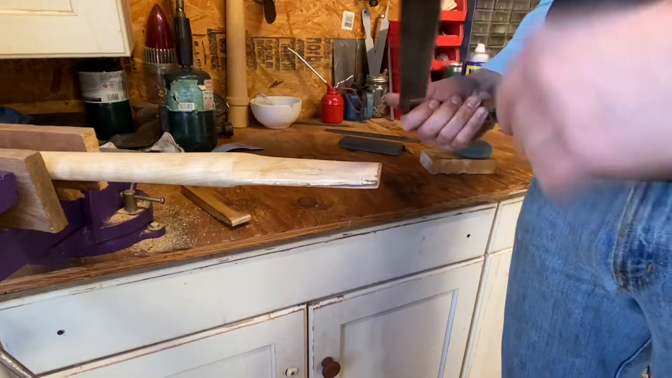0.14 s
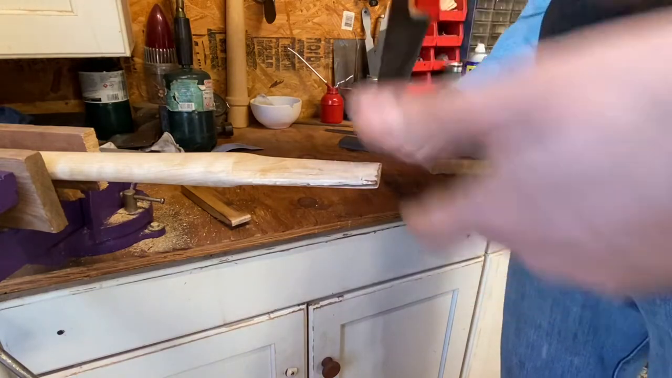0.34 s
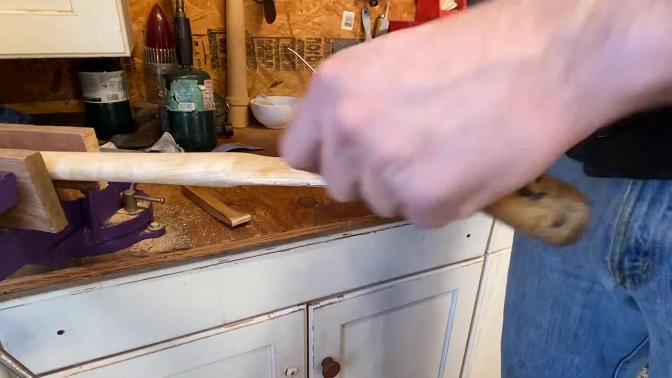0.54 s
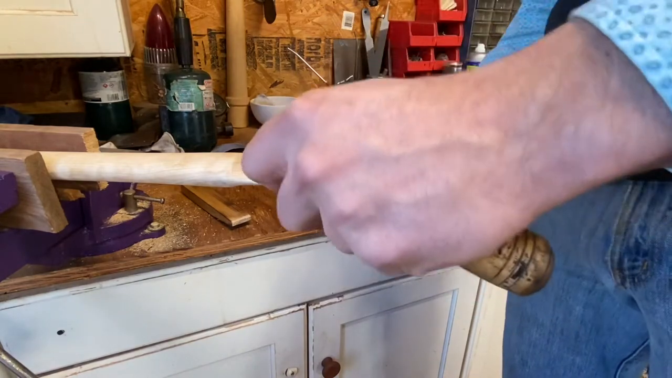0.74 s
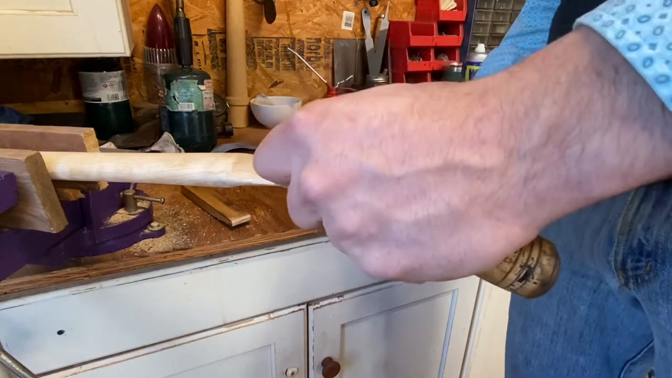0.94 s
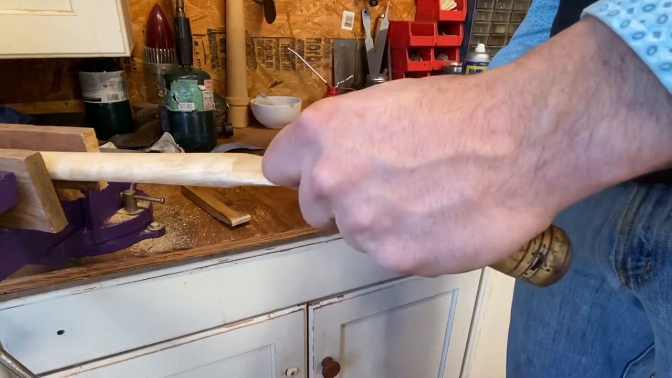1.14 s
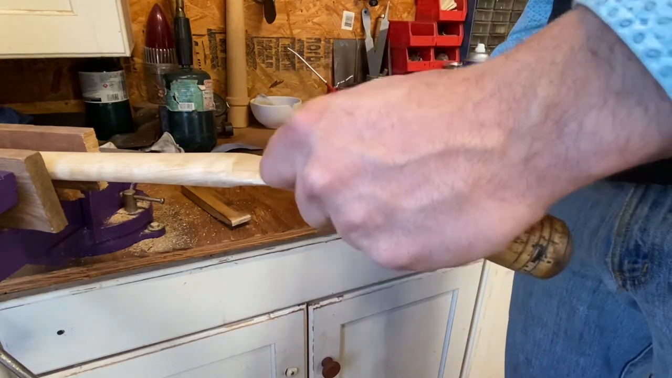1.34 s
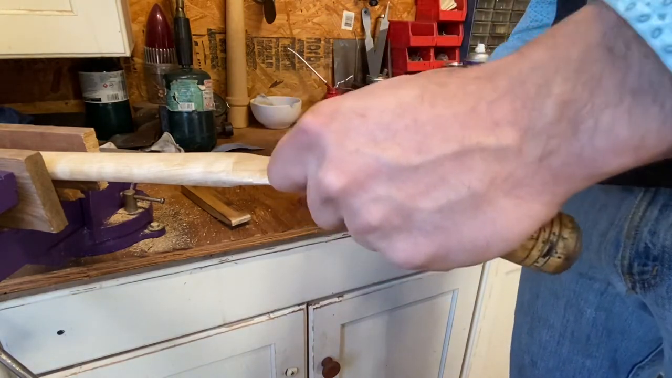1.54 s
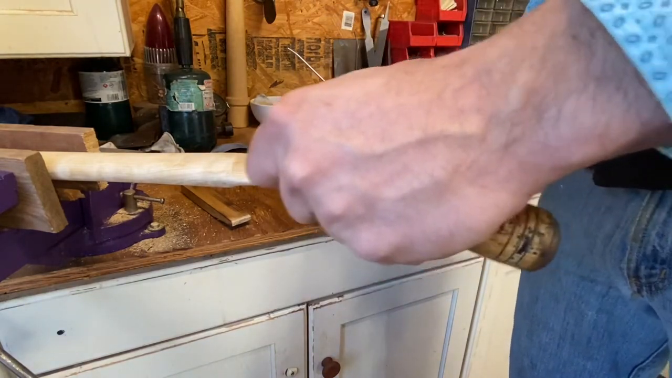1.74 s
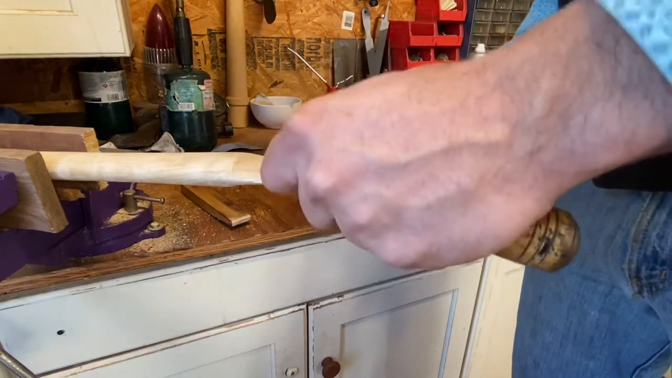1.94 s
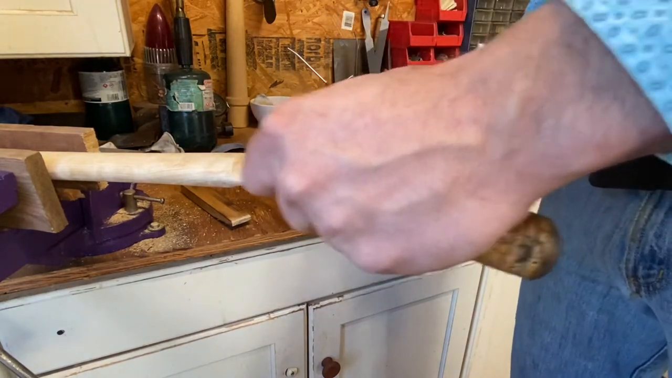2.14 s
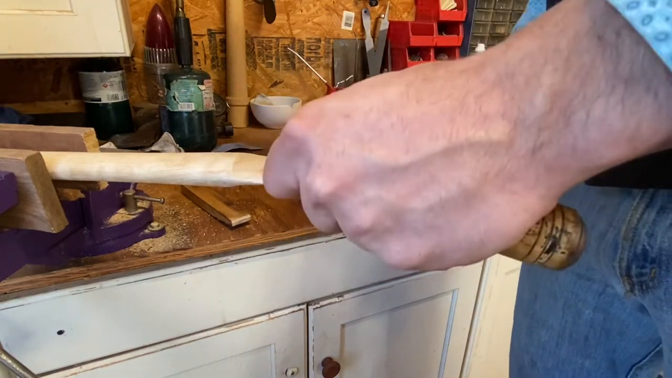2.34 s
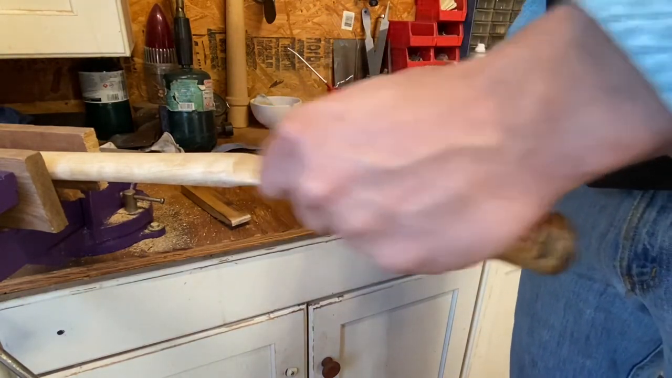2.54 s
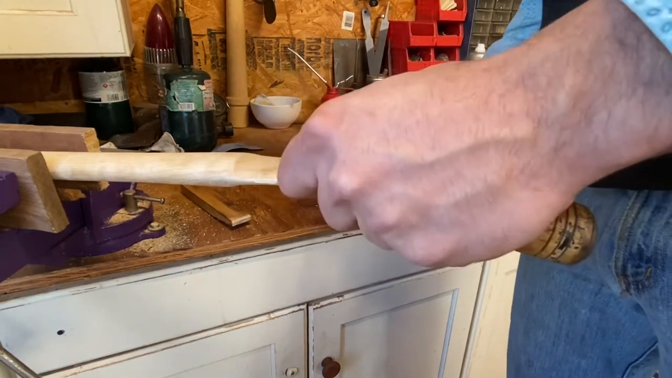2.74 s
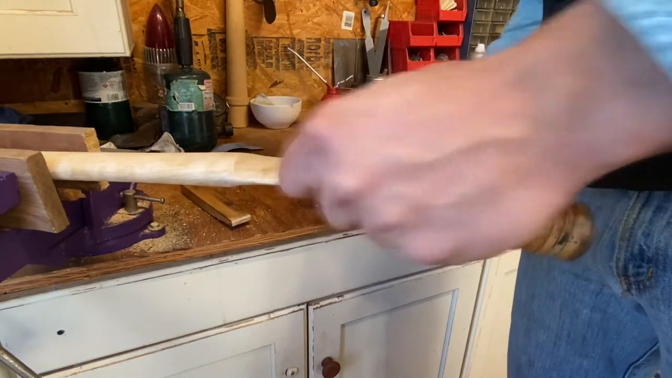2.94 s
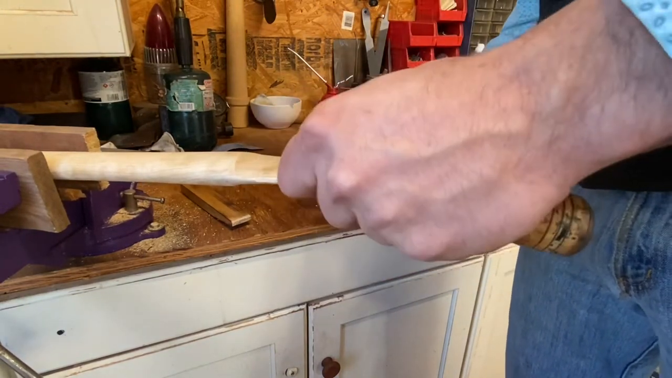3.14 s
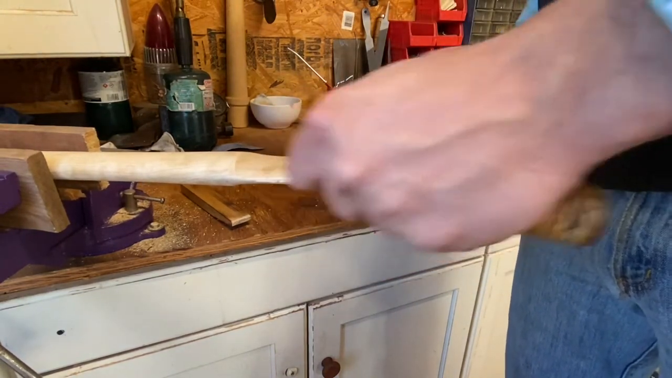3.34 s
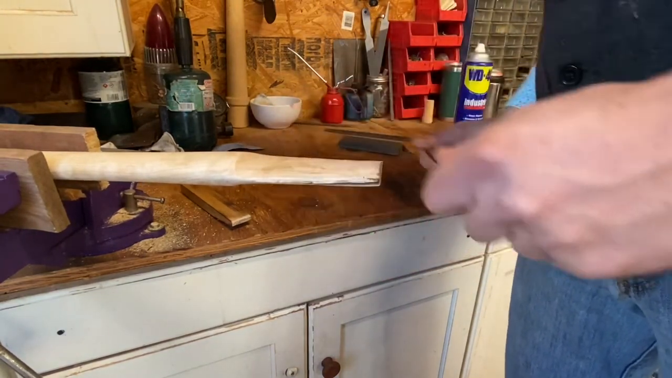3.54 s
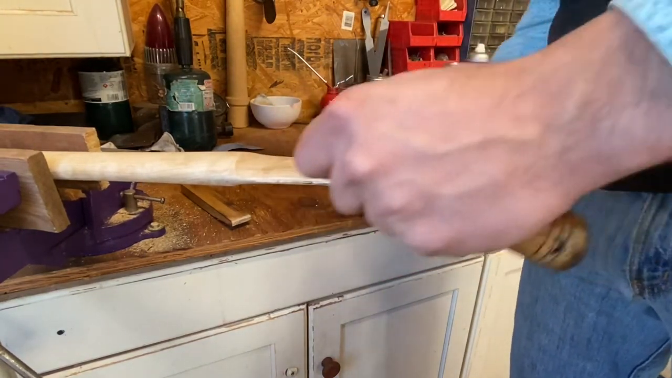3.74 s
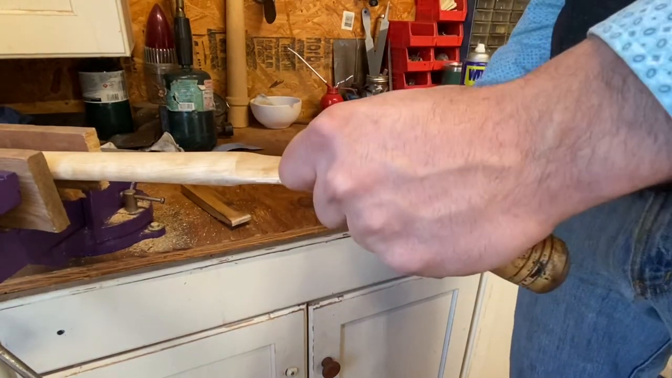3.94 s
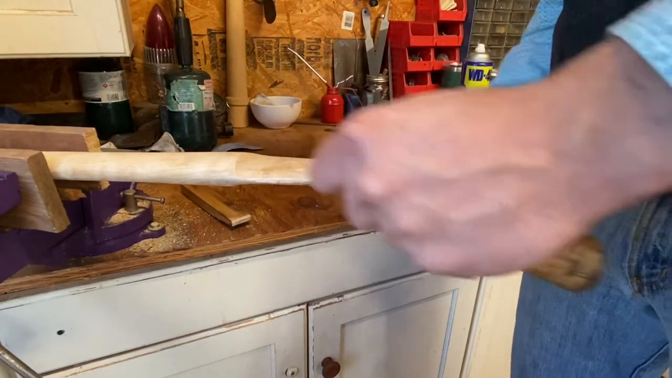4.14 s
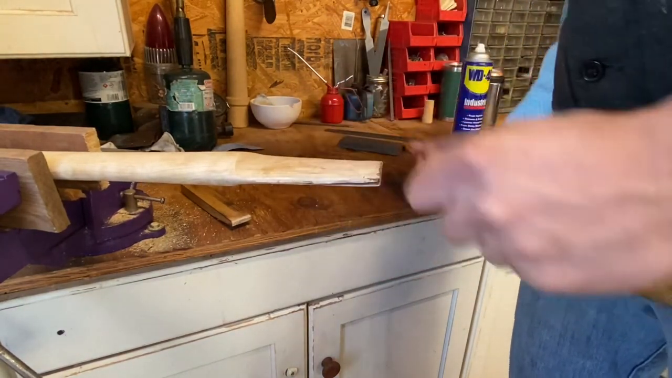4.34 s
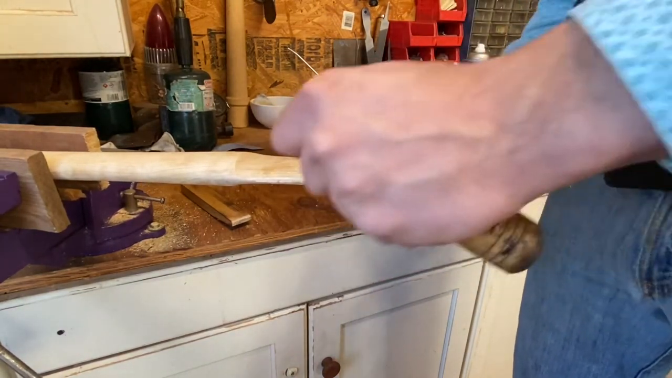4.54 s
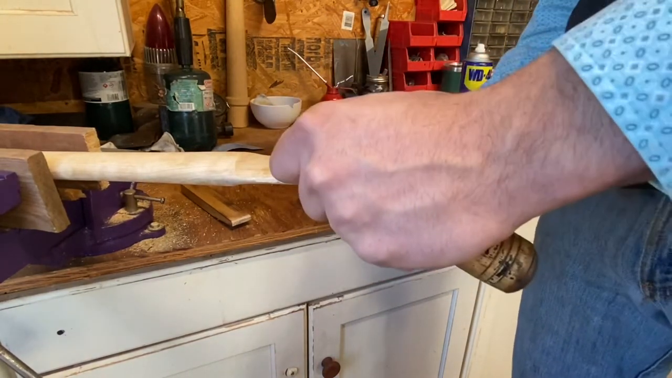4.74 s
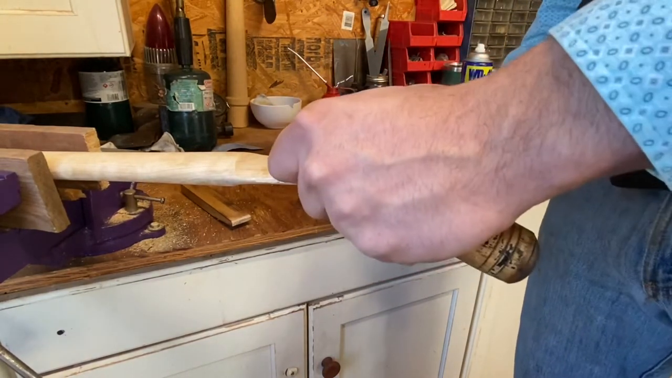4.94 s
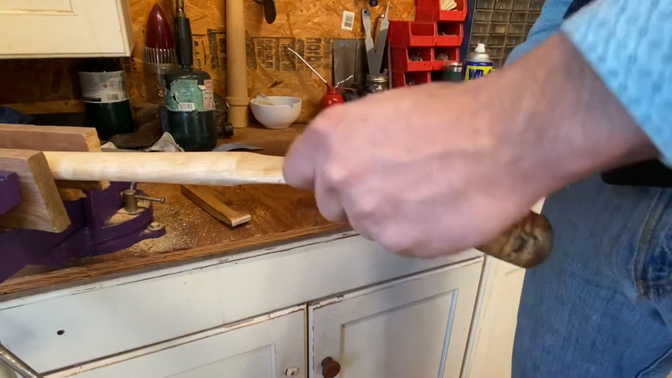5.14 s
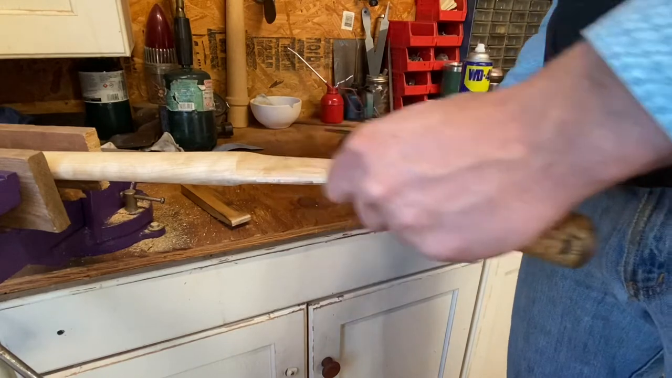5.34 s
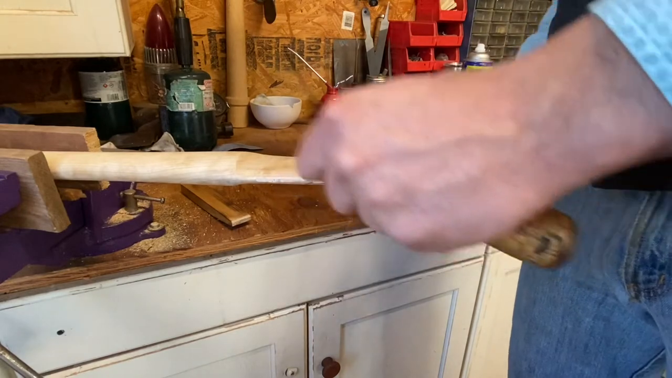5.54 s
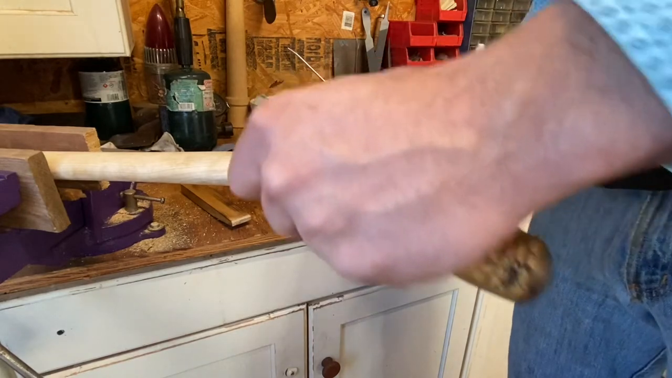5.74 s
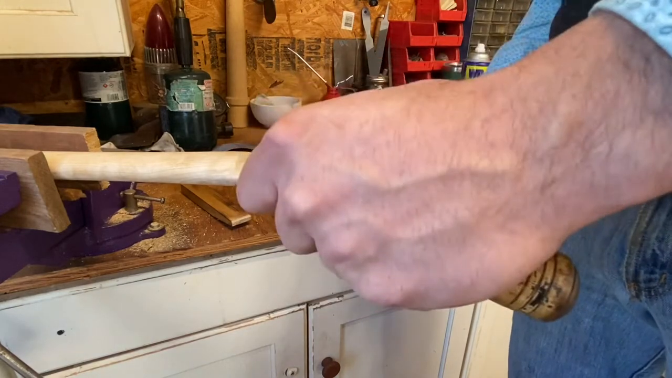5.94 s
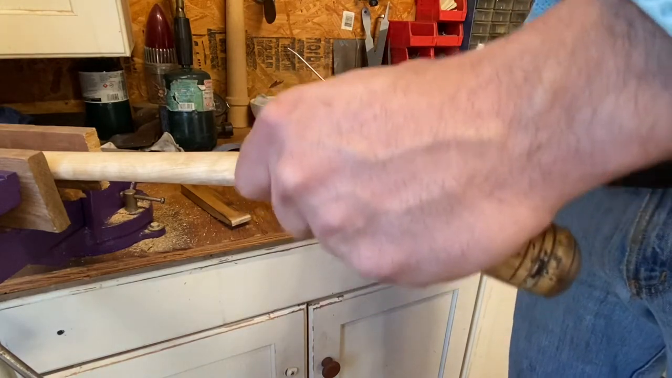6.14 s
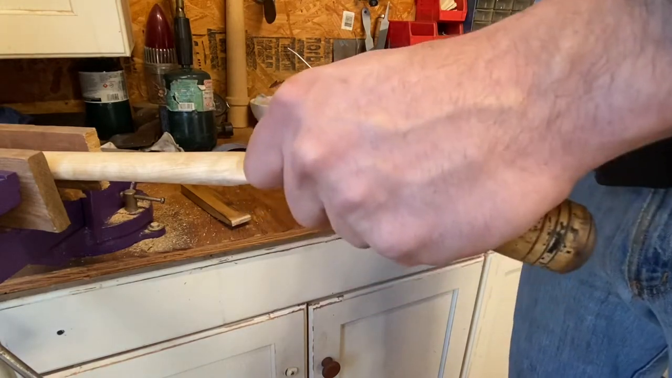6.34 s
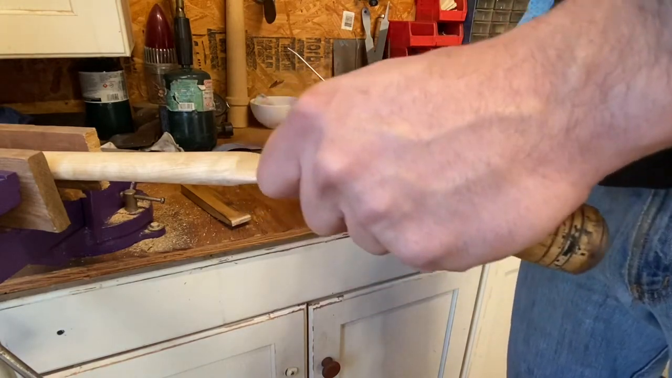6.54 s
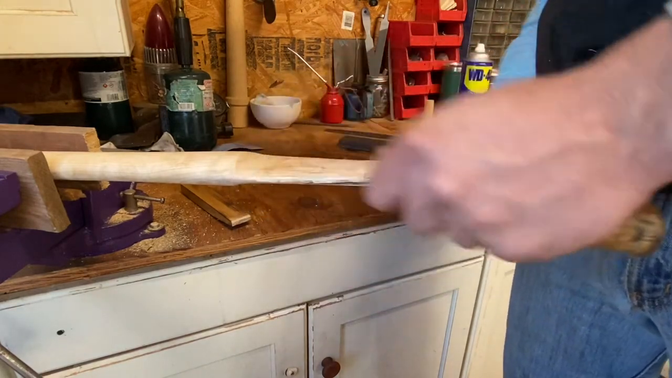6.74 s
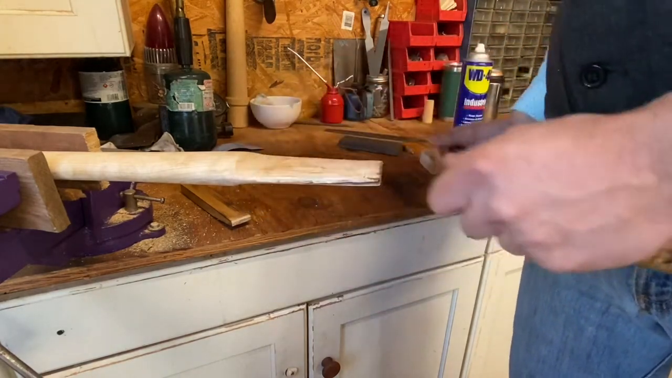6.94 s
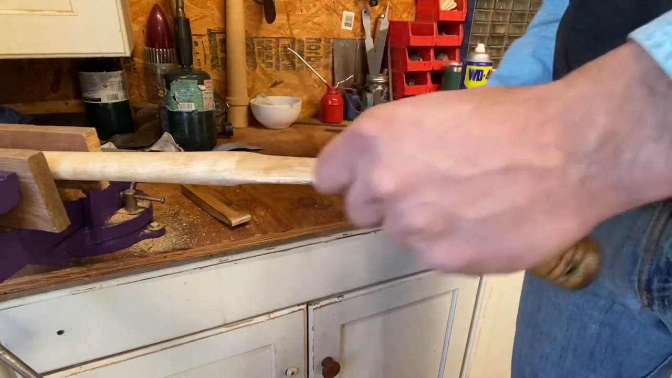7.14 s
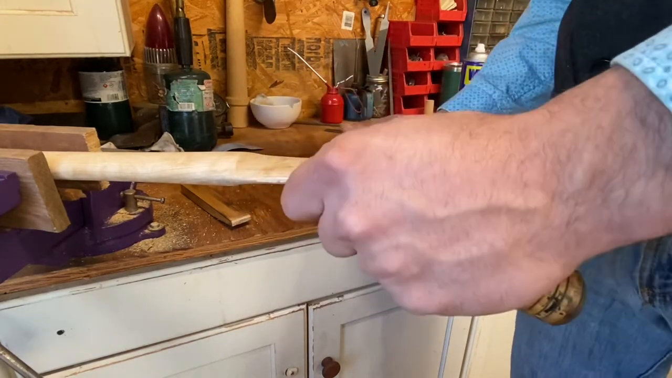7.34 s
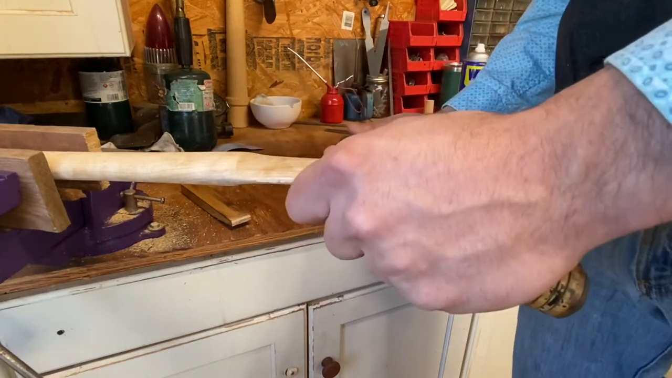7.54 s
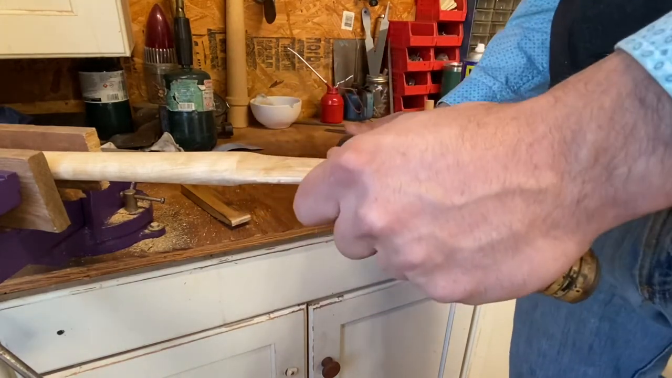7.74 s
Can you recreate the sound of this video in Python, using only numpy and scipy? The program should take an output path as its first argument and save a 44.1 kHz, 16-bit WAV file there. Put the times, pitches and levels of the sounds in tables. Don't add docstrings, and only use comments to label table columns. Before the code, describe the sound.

Close woody knocks and short dry rasps as a drawknife bites into a clamped stick, each landing booming softly through the wooden bench.

```python
import sys
import numpy as np
from scipy import signal
from scipy.fft import rfft, irfft, next_fast_len
from scipy.io import wavfile
from scipy.ndimage import uniform_filter1d

SR = 44100
rng = np.random.default_rng(int(sys.argv[2]) if len(sys.argv) > 2 else 0)


def gain_from_db(level_db):
    decades = np.asarray(level_db, float) / 20
    return 10 ** decades


def file_out(sig):
    cols = np.atleast_2d(sig).T
    lim = np.clip(cols, -1, 1)
    pcm = np.round(lim * 32767).astype(np.int16)
    wavfile.write(sys.argv[1], SR, pcm)


N = 343980

# [pitch_hz, width_hz, level_db]
BLADE_MODES = [(4470, 650, -7), (5760, 220, -4.5), (6510, 190, -6.5), (9170, 310, -5.5), (10460, 7500, -14),
               (14500, 620, -30.5)]
# [pitch_hz, width_hz, level_db]
EDGE_MODES = [(4796, 98, 15), (5185, 430, 19.5)]
# [pitch_hz, width_hz, level_db]
STICK_MODES = [(533, 160, 3), (929, 160, 4.5), (1037, 460, 4), (1404, 190, 4.5), (1660, 117, 5),
               (2035, 110, 7), (2480, 380, 4), (3040, 240, -4.5), (3155, 390, -13), (4320, 210, -22)]
WHISTLE_DB = [1.5, -12]

# [start_s, length_s, rasp_db, stick_share_db]
SLIDES = [
    (1.315, 0.093, -59, 9),
    (1.642, 0.1, -61, 7),
    (1.98, 0.11, -57.5, 3.5),
    (2.328, .13, -56, 7),
    (2.698, 0.17, -56, 4.5),
    (3.088, .125, -60.5, 6),
    (6.462, 0.064, -69, 14.5),
]
SLIDE_ENDS_DB, SLIDE_LEAN, SLIDE_FLAT = -24.5, 1.1, 4.5
# [bite_s, length_s, rasp_db, climb_db, stick_share_db]
CUTS = [
    (1.472, 0.034, -48.5, -2, 10.5),
    (1.793, .04, -47.5, 7, 6.5),
    (2.149, 0.035, -42, 8.5, 9),
    (2.522, 0.034, -39, 8, 4.5),
    (2.909, 0.034, -42.5, 10, 5),
    (3.277, 0.032, -42, 18, 3.5),
    (4.157, 0.0422, -41, 7, 1),
    (6.696, 0.047, -41.5, 23.5, 1),
    (7.795, 0.029, -69.5, -2, 17),
]
BITE_DB, BITE_S = 12.5, 0.003
# [start_s, length_s, rasp_db, sag_db, stick_share_db]
SHAVES = [(0.975, 0.026, -51.5, 3, 12), (4.014, 0.039, -47, 4, 14.5), (4.073, 0.026, -40.5, 11, 11.5),
          (5.065, 0.03, -46.5, -6, 10.5), (5.266, .09, -53, 3.5, 9), (6.125, 0.048, -65, 19, 12.5),
          (6.595, 0.05, -45, -4.5, 10), (7.173, 0.09, -64, 15.5, 24), (7.34, 0.055, -70, 5, 21.5),
          (7.409, 0.018, -59.5, -9, 13.5), (7.591, 0.033, -87, 4.5, 21.5), (7.685, .035, -85.5, 2, 21)]
# [start_s, rasp_db, stick_share_db]
TOUCHES = [
    (1.036, -57, 20.5),
    (3.291, -49.5, 18),
    (3.927, -76, 21),
    (3.946, -63.5, 7),
    (4.822, -76, 20),
    (4.886, -61, 14),
    (5.227, -49.5, 11),
    (6.037, -82, 22.5),
    (6.109, -60, 15.5),
    (7.1617, -57, 18.5),
]
TOUCH_S = 0.002
CUT_ENTER_DB_PER_S, SHAVE_ENTER_DB_PER_S, TOUCH_ENTER_DB_PER_S = 1086.5, 1397, 5005
LEAVE_DB_PER_S, TOUCH_FADE_DB_PER_S = 1303.5, 730
STICK_LINGERS = 0.81

# [start_s, crack_db, contact_pitch_hz, low_voice_share_db, steel_share_db]
KNOCKS = [(0.7068, -45.5, 1730, 2, -24), (0.9768, -49.5, 2000, -19, 0), (1.037, -34, 1150, -51, -23),
          (1.4757, -23.5, 2480, -0.5, -12.5), (1.798, -38.5, 2480, 5.5, -0.5),
          (2.1497, -24.5, 1400, -8, -7.5), (2.524, -28.5, 1960, -2.5, -12), (2.9142, -30, 1570, -1, -4),
          (3.2754, -37.5, 2480, -35.5, -3), (3.2961, -33, 1530, 8, -22), (3.808, -43, 1390, -7, -45.5),
          (4.1601, -40, 1660, 18, -37), (4.6584, -35, 1920, -2, -52), (4.8259, -65.5, 2570, -8.5, -22),
          (4.886, -73, 3040, 24, -2), (5.0992, -41.5, 2380, -24, -28.5), (5.23, -35, 1660, -17.5, -28.5),
          (5.7525, -32.5, 1690, -4.5, -28), (6.1099, -49.5, 2450, 3.5, -4.5),
          (6.474, -57.5, 2000, 5.5, 3.5), (6.7085, -26.5, 1660, 0.5, -13), (7.1635, -28, 1820, -24, -22.5)]
KNOCK_RISE_MS, SOFTER_IS_SLOWER = 1.7, 0.25
SNAP_DB, SNAP_S = -12, 0.003
# [start_s, level_db, pitch_hz, width_hz]
TICKS = [
    (0.41, -63.5, 6000, 8400),
    (0.479, -57.5, 660, 580),
    (0.555, -61, 14800, 3000),
    (0.782, -71.5, 3450, 3000),
    (3.946, -73, 7900, 7060),
]
# [start_s, length_s, level_db, pitch_hz]
SQUEAKS = [
    (7.585, 0.0417, -72, 2400),
    (7.69, 0.037, -69, 2100),
    (2.9, 0.028, -75, 4000),
]
SQUEAK_WIDTH_HZ = 60

# [start_s, push_on_doors_db, top_share_db, pull_on_carcase_and_frame_db, swell_ms]
JOLTS = [(0.706, -59.5, 12, -42.5, 31), (1.038, -27, -11.5, -27.5, 27), (1.473, -23, -11.5, -26, 31),
         (1.796, -27.5, -5.5, -32, 17.7), (2.152, -23, -6.5, -19, 15), (2.526, -23.5, -4.5, -26, 22.8),
         (2.915, -26, 1, -25, 20.4), (3.278, -24, -7.5, -19.5, 20), (3.295, -35, 2, -24.5, 32),
         (3.81, -46.5, 2.5, -47.5, 16.6), (4.053, -47, 1.5, -39.5, 6.7), (4.1, -34.5, -19, -34.5, 7.7),
         (4.163, -44, 8, -21.5, 28.3), (4.663, -44.5, 2, -36, 25), (4.895, -35.5, -12.5, -32, 20.6),
         (5.104, -35.5, -3.5, -31, 3.9), (5.235, -39.5, -11, -45, 8.6), (5.754, -41.5, 2, -33, 31),
         (6.108, -42.5, -9.5, -29.5, 35), (6.472, -50, -15, -33.5, 32), (6.627, -41.5, -12, -27.5, 7.3),
         (6.657, -61, -14, -38, 52), (6.715, -45.5, 6.5, -22, 24.4), (7.165, -40, -1, -37.5, 42)]
# [pitch_hz, width_hz, level_db]
TOP_MODES = [(202.6, 42, -10), (261, 14, -1), (329.5, 24, -5.5), (443.4, 21, -3), (580, 270, -18.5)]
# [pitch_hz, width_hz, level_db]
DOOR_MODES = [(121.6, 6.9, 4.5), (142.4, 24, -8.5), (151, 19, -13.5)]
# [pitch_hz, width_hz, level_db]
CARCASE_MODES = [(82.8, 10, 8), (109.2, 4.7, -6.5)]
# [pitch_hz, width_hz, level_db]
FRAME_MODES = [(45.46, 11, -9), (62, 23.5, -0.5), (33.5, 9.4, -3)]
CARCASE_DB, FRAME_DB = -3.2, -4.5

# [time_s, level_db]
SWAY = [(0.0, -48), (0.59, -51.5), (1.0, -47), (1.6, -56), (2.3, -98), (2.6, -58.5), (3.1, -44.5),
        (3.35, -60), (3.56, -53.5), (3.841, -50), (4.4, -54), (4.7, -52.5), (4.899, -48.5), (5.5, -54),
        (6.2, -53.5), (6.9, -51.5), (7.299, -47), (7.8, -52)]
PANELS_DB = -23.5
# [start_s, frame_db, panels_db]
ROCKS = [(0.78, -86, -63.5), (1.54, -31.5, -48), (1.89, -36.5, -53), (2.24, -30.5, -48.5), (2.53, -59, -41),
         (2.95, -48, -44.5), (3.332, -55, -42.5), (3.558, -59.5, -59), (4.23, -39.5, -47.5),
         (4.97, -52.5, -119), (5.1, -47, -62), (5.26, -36.5, -55.5), (6.681, -37, -41.5)]
ROCK_UP_DB_PER_S, ROCK_DOWN_DB_PER_S = 121.5, 89

# [start_s, level_db, settling_db_per_s]
CLOTH = [
    (0.014, -54, 343),
    (0.118, -62, 133),
    (0.193, -62, 120),
    (0.408, -60.5, 46.5),
    (0.552, -77.5, 63),
    (3.31, -63, 41.5),
    (4.21, -59.5, 196),
    (4.4, -71.5, 34),
    (6.769, -63, 56),
    (7.031, -78, 25),
]
FLICK_S = 0.012
# [pitch_hz, level_db_per_hz]
RUSTLE_SPECTRUM = [(470, -21.5), (800, -9.5), (1880, -17), (3880, -15), (9220, -21), (10800, -13.5),
                   (13300, -20), (14800, -18.5), (16000, -12.5)]
# [pitch_hz, t60_s]
SHOP_T60 = [(300, 0.11), (740, 0.24), (1940, 0.17), (5120, 0.16), (12000, 0.11)]
# [pitch_hz, level_db_per_hz]
AIR_SPECTRUM = [(120, -39.5), (175, -13.5), (270, -8), (309, -25), (361, -15), (612, -21.5), (837, -23.5),
                (905, -33.5), (4410, -42.5), (6910, -44.5), (16000, -55.5)]
AIR_DB = -66

# [pitch_hz, lag_samples]
RIGHT_LAG = [(1200, 17), (3000, 12)]
# [pitch_hz, difference_db]
LEFT_LIFT = [(200, 0.5), (700, 2.5), (2000, 4), (4500, 5), (8000, 3.5), (15000, -1.5)]
# [pitch_hz, width_hz, level_db]
SUM_DIPS = [(9300, 120, -4.5), (13600, 600, -20.5)]
# [pitch_hz, width_hz, level_db]
DIFFERENCE_DIPS = [(11200, 750, -14.5), (15400, 800, -14)]
CUT_HZ = 15830


def rasp():
    unevenness_db = 3.14 * np.minimum(rng.exponential(1, N), 5) + 2.0 * drift(130)
    tears = rng.standard_normal(N) * gain_from_db(unevenness_db)
    blade = evened(ring(tears, BLADE_MODES) + 0.017 * np.diff(tears, prepend=0))
    edge = evened(ring(tears, EDGE_MODES))
    stick = np.zeros(N)
    for hz, width, db in STICK_MODES:
        stick += gain_from_db(4.5 * drift(14)) * ring(tears, [(hz, 0.78 * width, db)])
    stick = evened(stick)
    out = np.zeros(N)
    for (steel_gain, wood_gain), whistle_db in zip([slides(), cuts()], WHISTLE_DB):
        out += steel_gain * (blade + gain_from_db(whistle_db) * edge) + 0.76 * wood_gain * stick
    return out


def slides():
    out = np.zeros((2, N))
    for s, length, db, share_db in SLIDES:
        progress = np.arange(0, 1, 1 / (length * SR))
        dip_db = SLIDE_ENDS_DB * abs(2 * progress ** SLIDE_LEAN - 1) ** SLIDE_FLAT
        add(out, s, gain_from_db([db + dip_db, db + share_db + STICK_LINGERS * dip_db]))
    return uniform_filter1d(out, size=200)


def cuts():
    strokes = []  # (start, stop, first dB, last dB, stick share dB, up dB/s, down dB/s)
    for s, length, db, climb_db, share_db in CUTS:
        strokes.append((s - length, s + BITE_S, db - climb_db, db, share_db, CUT_ENTER_DB_PER_S, LEAVE_DB_PER_S))
    for s, length, db, sag_db, share_db in SHAVES:
        strokes.append((s, s + length, db, db - sag_db, share_db, SHAVE_ENTER_DB_PER_S, LEAVE_DB_PER_S))
    for s, db, share_db in TOUCHES:
        strokes.append((s, s + TOUCH_S, db, db, share_db, TOUCH_ENTER_DB_PER_S, TOUCH_FADE_DB_PER_S))
    steel, wood = [], []
    for start, stop, first, last, share, up, down in strokes:
        steel.append((start, stop, first, last, up, down))
        wood.append((start, stop, first + share, last + share, up, STICK_LINGERS * down))
    for s, _, db, _, share_db in CUTS:
        bite_db = db + share_db + BITE_DB
        wood.append((s, s + BITE_S, bite_db, bite_db, TOUCH_ENTER_DB_PER_S, LEAVE_DB_PER_S))
    return uniform_filter1d([played(steel), played(wood)], size=60)


def knocks():
    out, t = np.zeros(N), np.arange(SR // 10) / SR
    for s, db, hz, low_db, steel_db in KNOCKS:
        rise_ms = KNOCK_RISE_MS * gain_from_db(-SOFTER_IS_SLOWER * (db + 26))
        decay = np.exp(-t / 0.0046) + 0.041 * np.exp(-t / 0.0049)
        burst = crackle((1 - np.exp(-1000 * t / rise_ms)) * decay)
        wood = ring(burst, STICK_MODES)
        contact = ring(wood, [(hz, 0.38 * hz, 0)])
        lowpass = signal.butter(3, 1.54 * hz, fs=SR, output="sos")
        contact = evened(signal.sosfilt(lowpass, contact))
        contact = contact + 0.05 * evened(ring(burst, [(hz, 90, 0)]))
        low = ring(np.roll(wood, 200), [(910, 360, 0)])
        steel = ring(burst, BLADE_MODES) + gain_from_db(-2.5) * ring(burst, EDGE_MODES)
        snap = ring(burst * np.exp(-t / SNAP_S), [(3590, 2000, 0)])
        blunt = np.clip(-(steel_db + 15.5) / 16, 0, 1)
        contact = contact + 0.26 * blunt * evened(ring(burst, [(2098, 13, 0)]))
        knock = evened(contact) + gain_from_db(low_db) * evened(low) + gain_from_db(steel_db) * evened(steel)
        knock += (1 - blunt) * gain_from_db(SNAP_DB) * evened(snap)
        add(out, s - 0.002, gain_from_db(db - 8) * knock)
    return out


def ticks():
    out, t = np.zeros(N), np.arange(800) / SR
    for s, db, hz, width in TICKS:
        burst = rng.standard_normal(800) * np.exp(-t / 0.009)
        add(out, s, gain_from_db(db) * evened(ring(burst, [(hz, width, 0)])))
    return out


def squeaks():
    out, t = np.zeros(N), np.arange(SR // 10) / SR
    for s, length, db, hz in SQUEAKS:
        drag = rng.standard_normal(len(t)) * np.sin(np.pi * np.minimum(t / length, 1))
        add(out, s, gain_from_db(db) * evened(ring(drag, [(hz, SQUEAK_WIDTH_HZ, 0)])))
    return out


def jolts():
    out, t = np.zeros((2, N)), np.arange(SR // 3) / SR
    parts = [(TOP_MODES, 0.6, 0.55), (DOOR_MODES, 0.65, 0.98), (CARCASE_MODES, 0.9, 0.98), (FRAME_MODES, 1.8, 0.98)]
    for s, down_db, top_db, along_db, swell_ms in JOLTS:
        levels_db = [down_db + top_db, down_db, along_db + CARCASE_DB, along_db + FRAME_DB]
        for db, (modes, slow, same) in zip(levels_db, parts):
            push = pair(same, len(t)) * t * np.exp(-1000 * t / (slow * swell_ms))
            middle_hz = modes[1][0]
            boom = ring(ring(push, modes), [(middle_hz, 1.1 * middle_hz, 0)])
            add(out, s, gain_from_db(db - 9.5) * evened(boom) * np.cos(1.5 * np.pi * t))
    return out


def sway():
    deep_modes = FRAME_MODES + [(75.6, 26, -12.5), (39.4, 4.5, -0.5)]
    deep = evened(ring(ring(pair(0.94, N), deep_modes), [(52, 380, 0)]))
    panel_modes = [(125, 57, -2), (176, 27.2, 0.0), (250, 57.7, -5.5), (416, 370, -13), (800, 810, -19.0)]
    panels = evened(ring(pair(0.22, N), panel_modes))
    weight = gain_from_db(np.interp(np.arange(N) / SR, *np.transpose(SWAY)))
    slopes = (ROCK_UP_DB_PER_S, ROCK_DOWN_DB_PER_S)
    frame_rock = played([(s, s, db, db, *slopes) for s, db, _ in ROCKS])
    panel_rock = played([(s, s, db, db, *slopes) for s, _, db in ROCKS])
    return (weight + frame_rock) * deep + (gain_from_db(PANELS_DB) * weight + panel_rock) * panels


def cloth():
    fibres = pair(0.086, N) * gain_from_db(1.3 * drift(45.3))
    flicks = played([(s, s, db, db, 10 / FLICK_S, settling) for s, db, settling in CLOTH])
    return flicks * evened(colour(fibres, lambda hz: read(RUSTLE_SPECTRUM, hz)))


def shop(x):
    length = SR // 3
    taps = np.zeros((2, 2, length))
    at = np.arange(90, length - 20, 20) + rng.integers(0, 20, (2, 2, (length - 91) // 20))
    np.put_along_axis(taps, at, rng.choice([-1., 1.], at.shape), 2)
    hz, t, z = signal.stft(taps, SR, nperseg=256)
    decay_db = -60 * t / read(SHOP_T60, hz)[:, None]
    tails = signal.istft(z * gain_from_db(decay_db), SR, nperseg=256)[1]
    tails = tails / np.linalg.norm(tails[0, 0])
    turn = 2 * np.pi * 1.7 * np.arange(N) / SR
    feeds = x * np.array([np.cos(turn), np.sin(turn)])
    return signal.fftconvolve(feeds[:, None], tails, axes=2).sum(0)[:, :N]


def air():
    return gain_from_db(AIR_DB) * evened(colour(pair(0.13, N), lambda hz: read(AIR_SPECTRUM, hz)))


def ring(x, modes):
    out = np.zeros(x.shape)
    for k, (hz, width, db) in enumerate(modes):
        out += (-1) ** k * gain_from_db(db) * signal.lfilter(*signal.iirpeak(hz, hz / width, SR), x)
    return out


def crackle(shape):
    x = rng.standard_normal(len(shape)) * shape
    for _ in range(4):
        z = rfft(x)
        x = irfft(z / (abs(z) + 1e-12), len(x))
        x *= shape / np.sqrt(uniform_filter1d(x ** 2, size=60) + 1e-20)
    return x


def played(strokes):
    step = 16
    t = np.arange(0, N + step, step) / SR
    gain = np.zeros(len(t))
    for start, stop, first_db, last_db, up, down in strokes:
        level_db = np.interp(t, [start, max(stop, start + 1e-4)], [first_db, last_db])
        gain += gain_from_db(level_db - up * np.maximum(start - t, 0) - down * np.maximum(t - stop, 0))
    return np.interp(np.arange(N) / SR, t, gain)


def drift(hz):
    return evened(signal.lfilter(*signal.butter(2, hz, fs=SR), rng.standard_normal(N)))


def pair(same, size):
    a, b = rng.standard_normal((2, size))
    same = np.clip(same, 0, 1)
    return np.array([a, same * a + np.sqrt(1 - same ** 2) * b])


def colour(x, db_of):
    size = next_fast_len(x.shape[-1])
    weights = gain_from_db(db_of(np.fft.rfftfreq(size, 1 / SR)))
    return irfft(rfft(x, size) * weights, size)[..., :x.shape[-1]]


def read(points, hz):
    f, value = np.transpose(points)
    return np.interp(np.log(hz + 1), np.log(f + 1), value)


def evened(x):
    return x / np.sqrt(np.mean(x ** 2) + 1e-20)


def add(mix, s, sound):
    part = mix[..., round(s * SR):][..., :sound.shape[-1]]
    part += sound[..., :part.shape[-1]]


def scene():
    scrape = rasp()
    crack = knocks() + ticks() + squeaks()
    near, hz = scrape + crack, np.fft.rfftfreq(N, 1 / SR)
    late = irfft(rfft(near) * np.exp(-2j * np.pi * hz * read(RIGHT_LAG, hz) / SR), N)
    direct = gain_from_db(-2.0) * np.array([near, late])
    reverberant = shop(gain_from_db(-3.5) * scrape + gain_from_db(-7.0) * crack)
    return direct + reverberant + jolts() + sway() + cloth() + air()


def port_dips(table, hz):
    return sum(db * np.exp(-((hz - f) / width) ** 4) for f, width, db in table)


def band_limit(x):
    return signal.sosfilt(signal.butter(12, 16480, fs=SR, output="sos"), x)


def record(dry):
    lifted = colour(dry, lambda hz: np.outer([0.5, -0.5], read(LEFT_LIFT, hz)) - 60 * (hz > CUT_HZ))
    to_sum = np.array([[1, 0.75], [1, -1.05]]) / np.sqrt(2)
    dipped = colour(to_sum @ lifted,
                    lambda hz: np.array([port_dips(SUM_DIPS, hz), port_dips(DIFFERENCE_DIPS, hz)]))
    return band_limit(to_sum @ dipped)


dry = scene()
out = record(dry)
file_out(out)
```